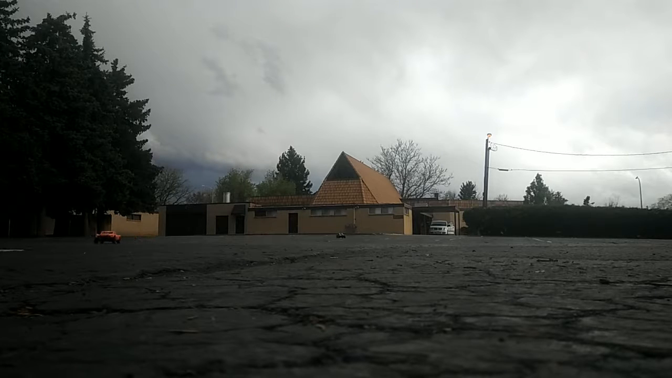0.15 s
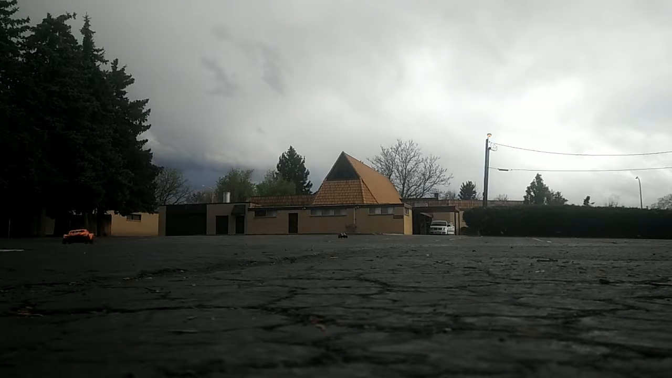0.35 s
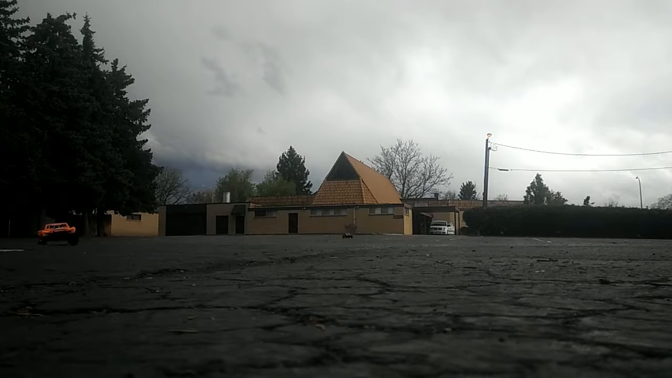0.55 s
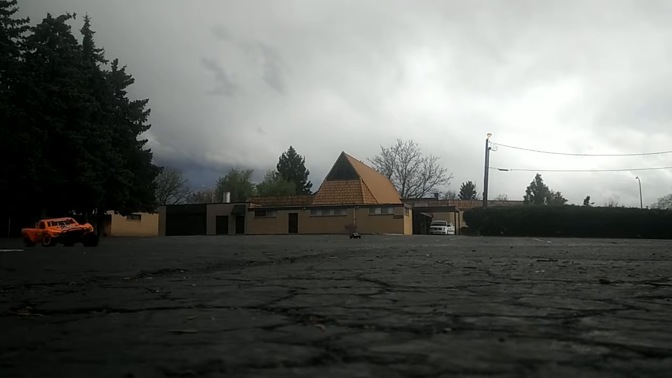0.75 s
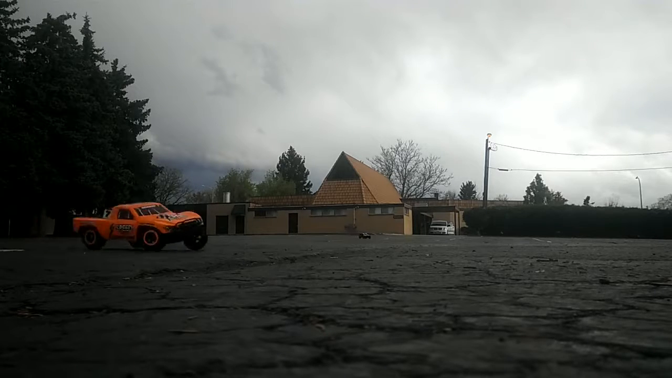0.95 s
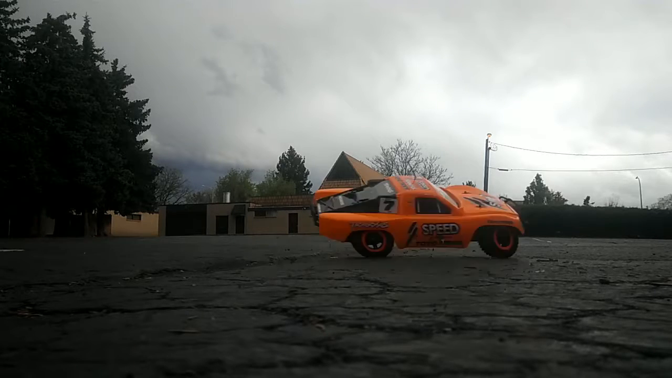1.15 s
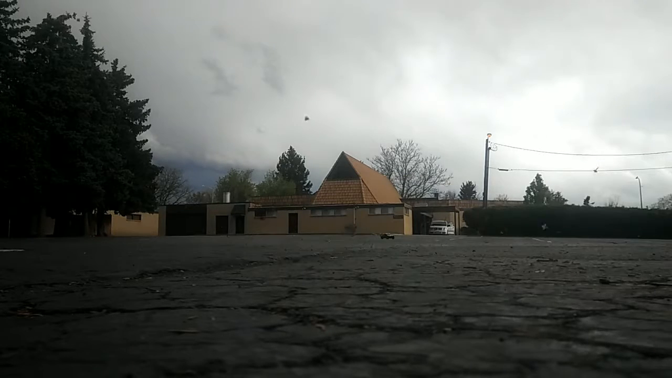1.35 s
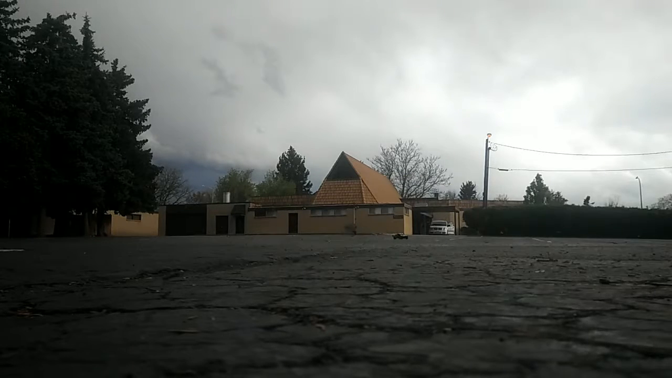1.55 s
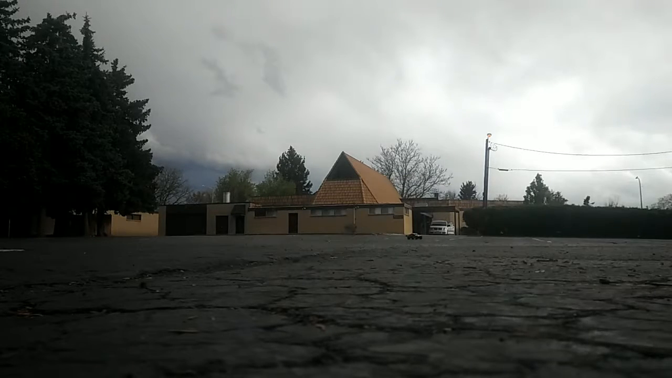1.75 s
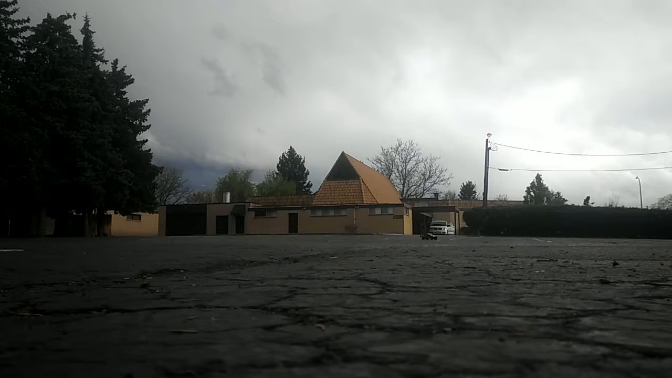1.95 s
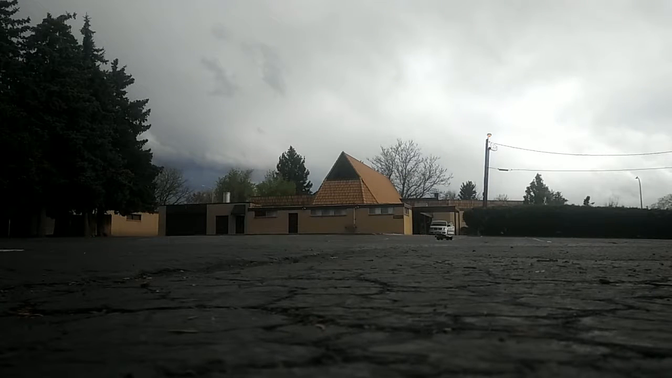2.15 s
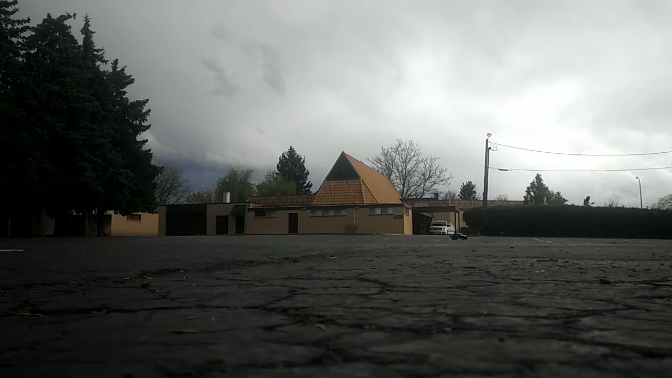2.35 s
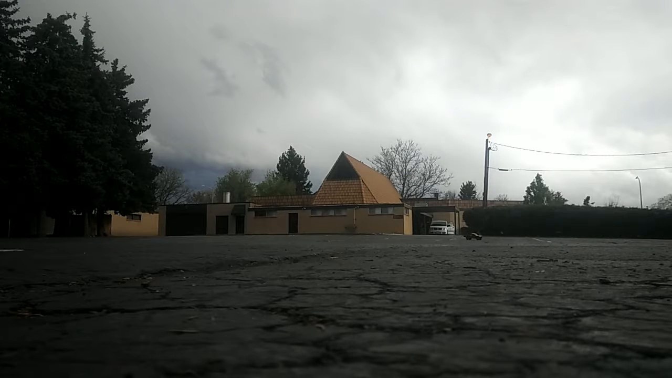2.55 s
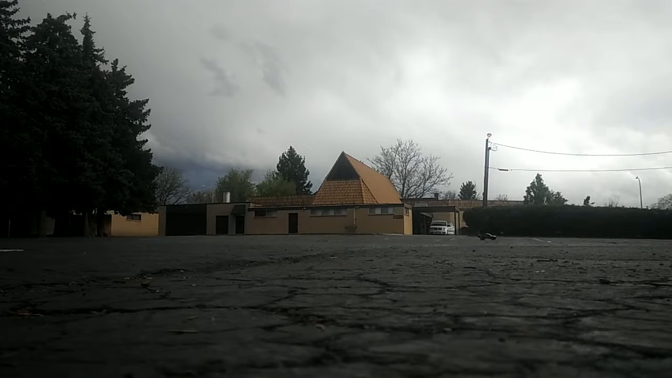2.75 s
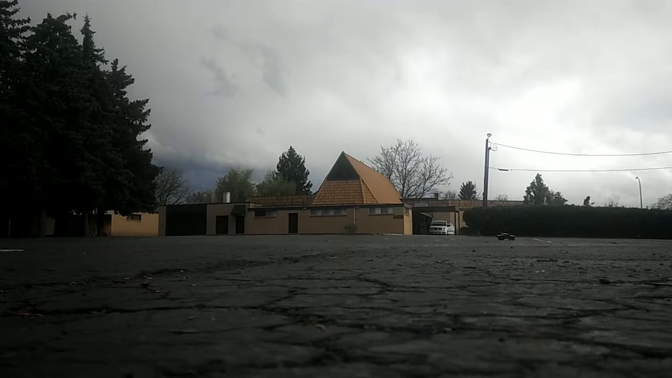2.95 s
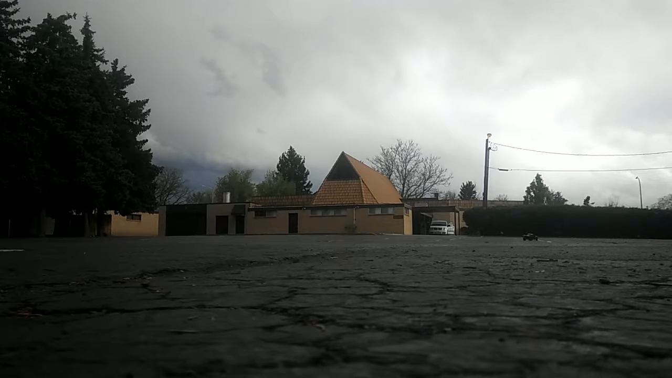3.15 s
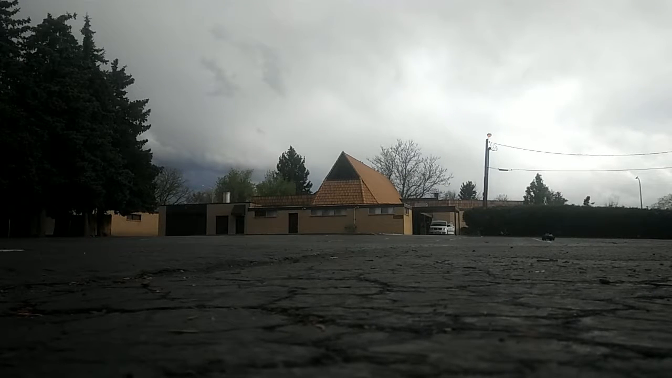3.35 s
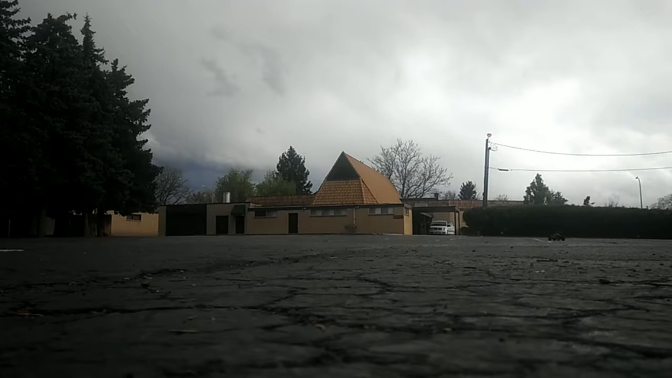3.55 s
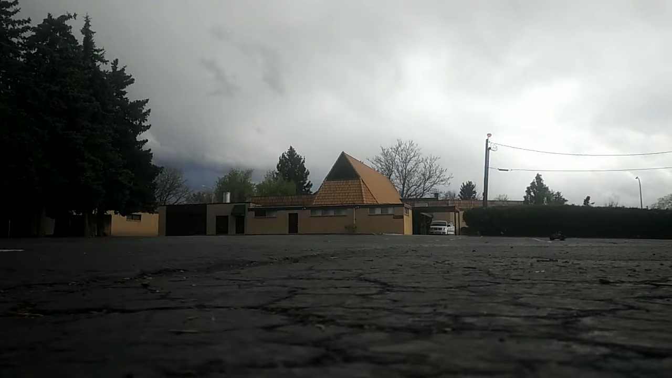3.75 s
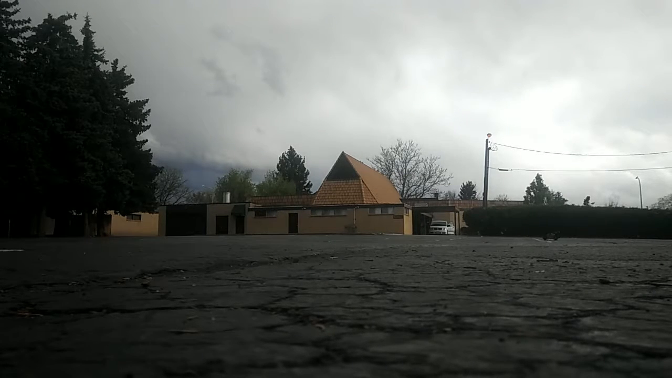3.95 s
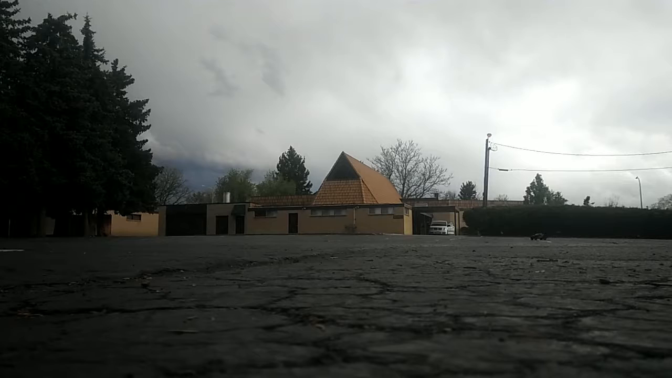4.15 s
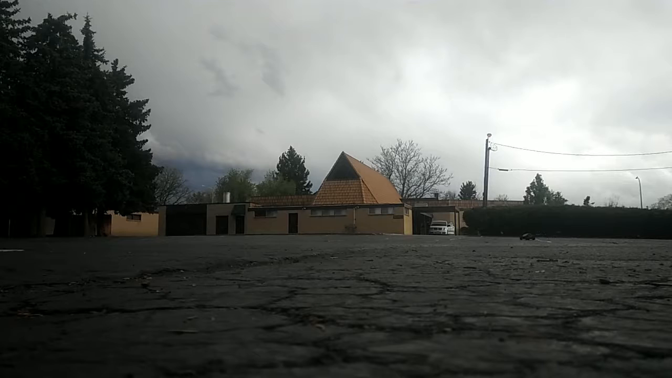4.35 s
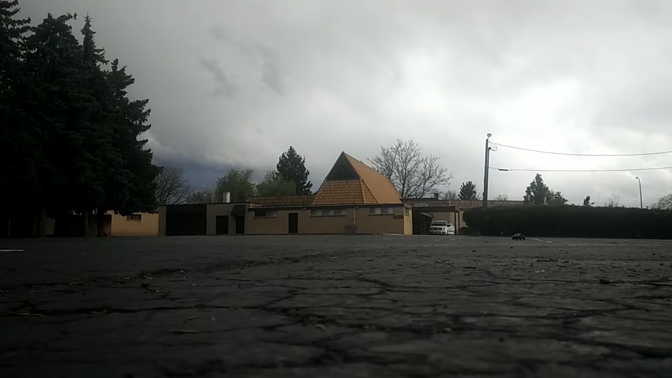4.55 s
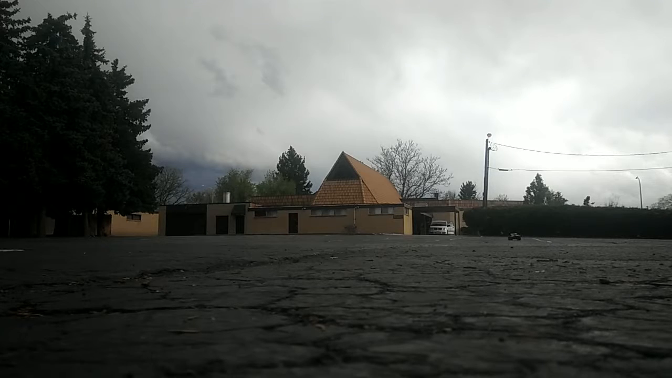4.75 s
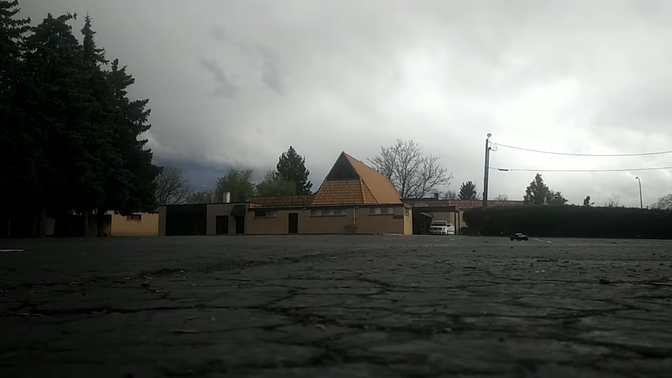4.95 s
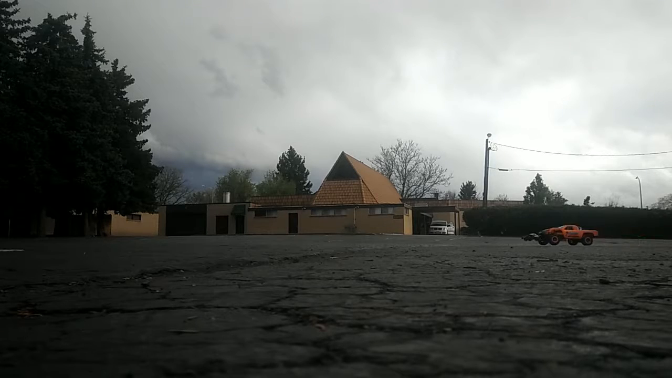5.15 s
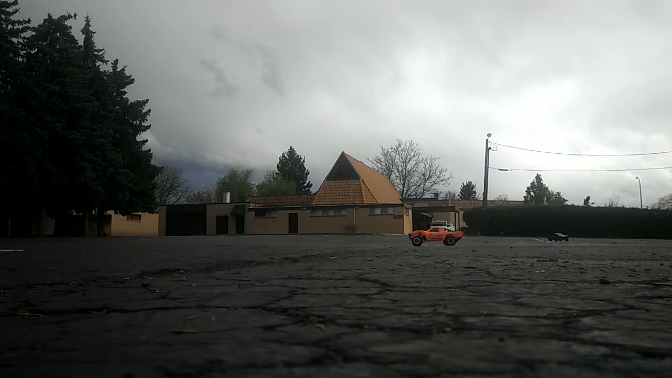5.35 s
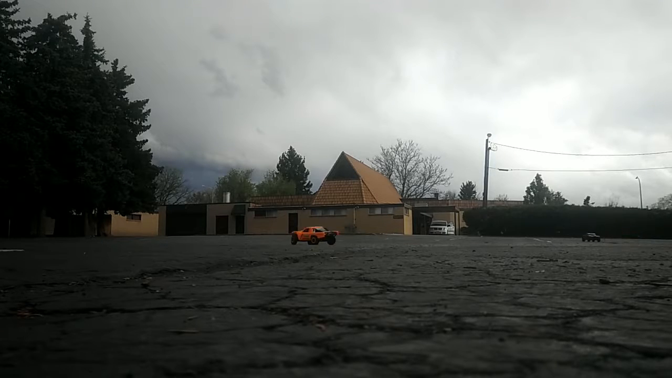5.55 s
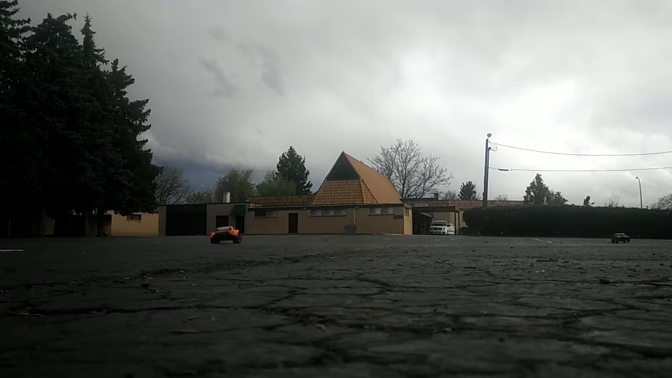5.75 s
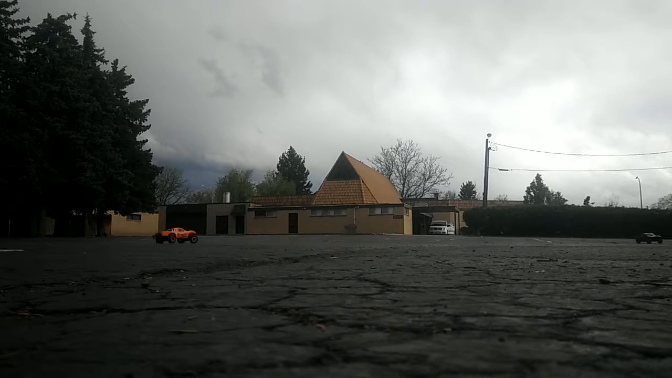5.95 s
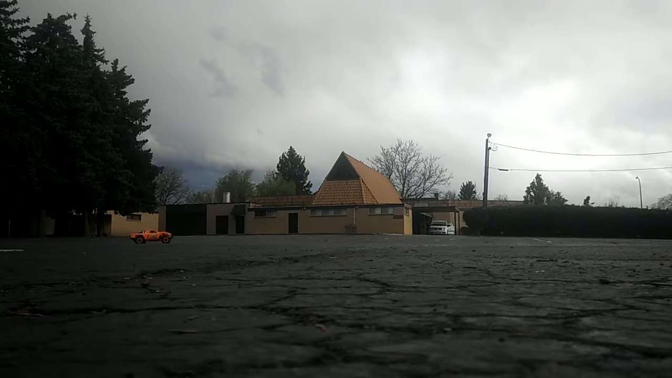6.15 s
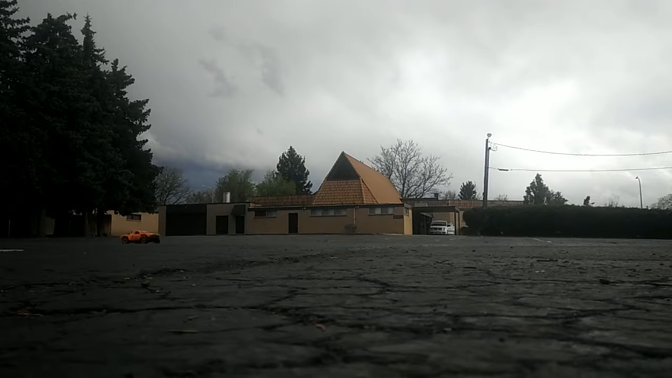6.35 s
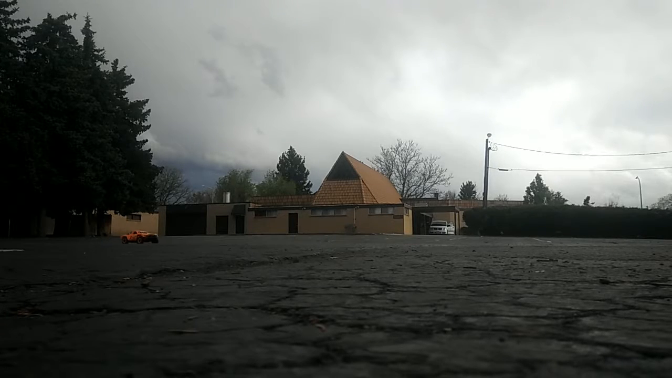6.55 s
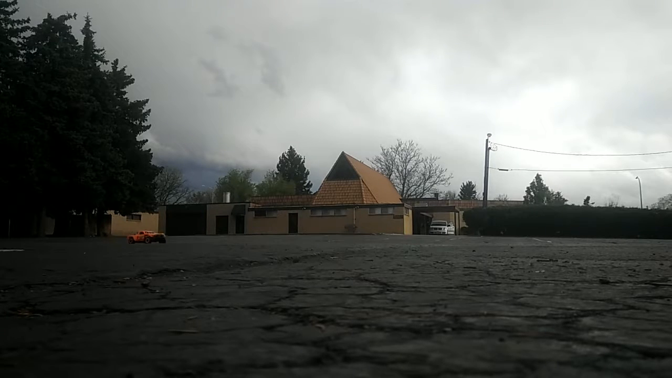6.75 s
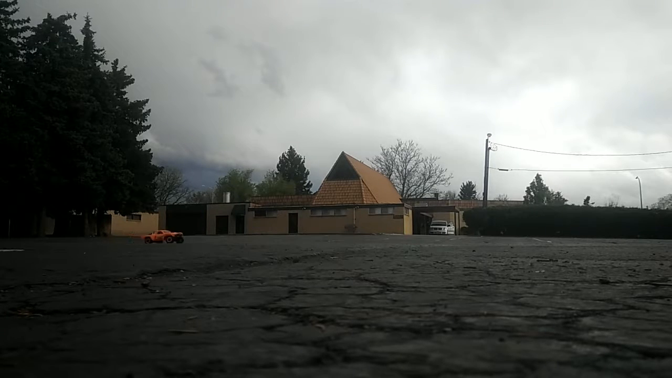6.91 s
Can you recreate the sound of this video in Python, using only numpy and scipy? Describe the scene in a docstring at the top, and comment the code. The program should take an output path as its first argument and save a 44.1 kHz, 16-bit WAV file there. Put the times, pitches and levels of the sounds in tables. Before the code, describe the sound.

Low wind buffets a microphone at ground level outdoors. A toy truck's shrill motor and tearing tyres swell quickly to a close pass, followed by loud plastic knocks, a hard crunch and broken scraping. There is a short lull with skittering stones and little tyre chirps, then the motor winds up again, whining and pulsing through a long gritty drift, dips almost to nothing and revs. Another truck buzzes weakly far away; the echo is faint.

```python
"""Toy trucks drifting on asphalt

Two small electric remote-controlled trucks, heard close to the ground. One races past, slams and scrapes
its plastic body, coasts, then whines off again with hopping wheels, brakes and pulls away. The other gives
bursts of throttle far off. Motors are sums of sine orders; tyres, scrapes and stones are filtered random
contacts; wind, thuds and ticks are filtered noise; squeaks and chirps are sines. A faint echo surrounds the trucks.
"""
import sys
import numpy as np
from scipy import signal
from scipy.fft import rfft, irfft
from scipy.io import wavfile
from scipy.ndimage import uniform_filter1d, minimum_filter1d, map_coordinates

SR = 44100
rng = np.random.default_rng(int(sys.argv[2]) if len(sys.argv) > 2 else 0)


def materialize(psi):
    """Save the field psi as 16-bit PCM at rate SR to the path in sys.argv[1].

    A 1-D psi becomes a single channel; in a 2-D psi each row is a channel.
    """
    bounded = np.clip(np.atleast_2d(psi).T, -1, 1)
    quanta = np.round(bounded * 32767).astype(np.int16)
    wavfile.write(sys.argv[1], SR, quanta)


N = 307818
TIME = np.arange(N) / SR  # seconds

# Spectra only shape a sound, which is then scaled to an rms of 1.
# A swell's length_s spans its two points at 1/e of the peak.

# Wind gusts on the microphone: middle_s, level_db, length_s
WIND_GUSTS = [(0.145, -45.5, 0.23), (0.44, -42.5, 0.18), (0.69, -36, 0.4), (1.695, -43, 1.29),
              (5.068, -48, 0.33), (6.084, -44.5, 0.13), (6.758, -38.5, 0.27)]
# Spectrum of the wind rumble: frequency_hz, level_db
WIND_SPECTRUM = [(20, -48), (50, -22.5), (90, 1.5), (140, 2.5), (210, -1.5), (320, -14.5), (3000, -95)]
BREEZE_DB = -71

# Throttle bursts of the far truck: start_s, end_s, motor_turns_hz, level_db (before the hum wavers)
FAR_BURSTS = [(2.65, 2.776, 752, -41.5), (2.818, 2.885, 750, -41.5), (2.987, 3.035, 810, -41.5),
              (3.299, 4.751, 740, -50.5), (4.801, 5.515, 804, -47.5), (5.7, 6.426, 796, -47)]
# Low motor orders that survive the distance: multiple of the motor turn, level_db
FAR_ORDERS = [(1, -5), (2, -8), (3, -9), (4, -16)]

# Loose stones skittering as the near truck coasts: start_s, level_db, length_s (before the fade)
STONE_RATTLES = [(2.326, -40, 0.014), (2.414, -35.5, 0.012), (2.474, -36.5, .006), (2.526, -38, .006),
                 (2.558, -35.5, 0.054)]
# Sideways tyre scuffs: middle_s, level_db, length_s
SCUFFS = [(2.59, -37, 0.089)]
# Rising chirps as tyres bite: middle_s, pitch_hz (at the middle), length_s, level_db
CHIRPS = [(2.745, 1420, 0.085, -39), (2.851, 1400, 0.08, -39)]
CHIRP_RISE_PER_S = 2.6  # share of the pitch gained each second
# Squeaks of tyres and suspension: middle_s, pitch_hz, length_s, level_db
SQUEAKS = [(0.895, 7260, 0.01, -27), (1.268, 7020, 0.012, -15), (2.106, 4020, 0.015, -20.5),
           (2.488, 2300, 0.0065, -26), (2.547, 9600, .035, -44), (5.589, 3000, 0.014, -31.5),
           (6.014, 4480, 0.028, -36.5), (6.082, 4570, 0.053, -38)]
# Ticks of flung grit: start_s, level_db, fade_s
GRIT_TICKS = [(1.448, -20, 0.0049), (1.629, -2.5, 0.0038), (1.635, -8, .002)]
# Spectrum of a grit tick: frequency_hz, level_db
TICK_SPECTRUM = [(2000, -36), (5000, -7), (8200, 2), (10500, -6), (13000, -4), (15500, -15)]
# Dull bumps: middle_s, level_db, length_s
BUMPS = [(0.719, -26.5, 0.029), (2.411, -31.5, 0.011), (6.034, -34, 0.016), (6.724, -24.5, 0.042)]
# Spectrum of a dull bump: frequency_hz, level_db
BUMP_SPECTRUM = [(30, -37), (190, 3.5), (255, -3), (700, -32), (3000, -98)]

# Chassis blows and scrapes: start_s, body_db, drag_s, fade_s, rasp_db (relative to the body)
SCRAPES = [(1.2, -14.5, 0.032, 0.028, -5), (1.235, -17, 0.0016, 0.0028, -15),
           (1.255, -17, 0.005, 0.035, -2.5), (1.393, -33, .02, .008, 11), (1.531, -31, 0.045, 0.039, -11),
           (1.621, -8, 0.027, 0.0099, -8), (1.653, -5.5, 0.037, 0.01, -4.5),
           (1.702, -11.5, 0.011, 0.051, -2), (1.749, -24, 0.0036, 0.012, 1),
           (1.819, -18.5, 0.059, 0.053, -5.5), (1.975, -22.5, 0.021, 0.019, -1),
           (1.996, -18, 0.027, 0.066, -5.5), (2.047, -12.5, 0.02, 0.02, -16),
           (2.083, -15.5, 0.0084, 0.023, -11), (2.15, -8, 0.0064, 0.0065, -6),
           (2.168, -16, 0.025, 0.016, -16), (2.211, -13.5, 0.0046, 0.02, -12.5),
           (2.238, -21.5, 0.04, 0.053, -7), (5.539, -33, 0.062, 0.033, -19), (5.576, -42, 0.013, 0.006, 10)]
# Resonances of the plastic body: frequency_hz, width_hz, level_db
SHELL_MODES = [(301, 31, -0.5), (478, 50, 7), (588, 60, -0.5)]
# Resonances of panels under a hard blow: frequency_hz, width_hz, level_db
PANEL_MODES = [(577, 80, 3), (744, 120, 2.5), (920, 140, -4), (1090, 88, -2.5), (1520, 100, -1),
               (2340, 130, -8.5)]
# Spectrum of the body boom: frequency_hz, level_db
BODY_SPECTRUM = [(60, -47), (120, -17), (190, -14.5), (295, -0.5), (350, -3.5), (460, 2), (720, -4.5),
                 (1070, -5.5), (1450, -14), (2200, -33), (4400, -58.5)]
# Spectrum of the low thump in the hardest blow: frequency_hz, level_db
THUMP_SPECTRUM = [(35, 2), (60, -2), (130, 3), (260, -8), (1000, -64.5)]
# Spectrum of plastic rasping on stones, also of loose stones: frequency_hz, level_db
RASP_SPECTRUM = [(150, -57), (700, -14.5), (1400, 5), (2200, 6), (3000, 1.5), (4200, 1.5), (6500, 0),
                 (8500, -7.5), (12000, -20), (15500, -30)]
SLAM_S, SLAM_LENGTH_S = 1.67, 0.077  # middle and length of the hardest blow

# Spectrum of gritty tyre scrub: frequency_hz, level_db
SCRUB_SPECTRUM = [(300, -76.5), (1000, -13.5), (1500, 2.5), (1900, 2), (2700, 1), (3450, 0.5), (4200, 0),
                  (5100, -4.5), (6300, -2.5), (7200, -6.5), (7800, -21.5), (9500, -60), (13000, -53)]
# Spectrum of the humming body: frequency_hz, level_db
HUM_SPECTRUM = [(150, -29), (310, -7), (410, 2), (470, 1), (560, -2.5), (900, -23), (2500, -73)]
# Spectrum of the low tread resonance: frequency_hz, level_db
DRONE_SPECTRUM = [(200, -47), (500, -24.5), (630, -1), (760, 3.5), (880, 0.5), (1100, -6), (5000, -88)]
# Spectrum of the high tread resonance: frequency_hz, level_db
SONG_SPECTRUM = [(350, -56.5), (800, -18.5), (1000, -4), (1350, 1.5), (1500, -1.5), (1680, -3.5),
                 (1950, -9.5), (3000, -42), (8000, -73.5)]
# Spectrum of the grit spray: frequency_hz, level_db
SPRAY_SPECTRUM = [(2000, -70), (5000, -6.5), (7500, 1.5), (8300, -2.5), (10000, -11.5), (12500, -13.5),
                  (15500, -30)]
# Spectrum of slapping tread blocks at the reference motor speed: frequency_hz, level_db
GROWL_SPECTRUM = [(400, -45), (650, -20), (760, -6), (850, 3), (950, -5), (1080, -28), (1300, -15),
                  (1520, 1.5), (1640, 5), (1800, -3), (2400, -39)]
GROWL_AT_HZ = 796  # reference motor speed

# Near motor and gear orders, before flutter and overtone loss: multiple of the motor turn, level_db
NEAR_ORDERS = [(1, -6), (2, -4), (4, 0), (6, -8), (7, -22), (8, 2.5), (9, -8.5), (12, -16.5), (16, -12.5)]
MESH, GEAR_RATIO = 8, 31  # pinion mesh order; motor turns per wheel turn
# Resonances of the gearbox housing: frequency_hz, width_hz, level_db
GEARBOX_MODES = [(1359, 92, 3.5), (3430, 64, -1.5), (6050, 110, -3.5), (6940, 99, -2)]

# Run-up motor speed, dropping in pitch on passing: time_s, motor_turns_hz
RUN_UP_SPEED = [(0, 885), (1.27, 886), (1.43, 845), (1.475, 682), (1.58, 683), (2.1, 510), (2.4, 403)]
# Run-up distance from the listener: time_s, distance_m
RUN_UP_DISTANCE = [(0, 5.94), (.35, 5.8), (.6, 3.93), (.85, 2.9), (1.17, 1.2), (1.31, 1.17), (1.41, 0.68),
                   (1.55, 1.01), (2.15, 1.98), (2.4, 5.5), (2.65, 5.5), (2.82, 9.2)]
# Run-up tyre sounds by name: level_db (at 1 m, before ground loss), ground_loss_db_per_m
RUN_UP_TYRES = dict(scrub=(-23.5, 1), hum=(-28.5, 3.65), drone=(-30, 1.7), song=(-25, .02),
                spray=(-21, 6.5))

# Second-run motor speed, before wheel hop sways it: time_s, motor_turns_hz
SECOND_RUN_SPEED = [(2.943, 389.6), (2.946, 499), (2.975, 501), (2.99, 544), (3.015, 556), (3.03, 588),
                    (3.078, 619.6), (3.1, 599.3), (3.14, 655), (3.2, 695.5), (3.4, 793), (3.75, 778.6),
                    (4.2, 671), (4.65, 676.3), (5.0, 785), (5.4, 771.7), (5.8, 812), (6.2, 774),
                    (6.44, 756), (6.5, 691), (6.6, 415), (6.64, 276), (6.71, 100), (6.77, 155), (6.83, 410),
                    (6.89, 522), (6.98, 580)]
# Second-run path: time_s, distance_m, and added drone_db (low tread), song_db (high tread), whine_db
SECOND_RUN_PATH = [(2.9, 3.4, -21, -6, 2.5), (3.03, 3.9, -11, 2, -1.5), (3.09, 3.42, -1, 4, -4),
                   (3.4, 3.06, 0, 0.5, -2.5), (3.9, 3.43, 1.5, 3.5, 2), (4.3, 3.7, 2.5, -0.5, 0),
                   (4.68, 3.77, -7.5, -18, -1.5), (4.95, 3.24, -2.5, -11, -3), (5.4, 3.28, 0.5, -3.5, -3),
                   (6.0, 3.18, 4.5, 5.5, -5), (6.38, 3.86, 3.5, 3.5, -3), (6.65, 6.2, 4.5, 3.5, 1.5),
                   (6.98, 5.7, 8, 6, 4.5)]
# Second-run tyre sounds by name: level_db (at 1 m, before ground loss), ground_loss_db_per_m
SECOND_RUN_TYRES = dict(scrub=(-24.5, 0.43), hum=(-56, 0.73), drone=(-32, 0.33), song=(-29.5, 0.051),
                    spray=(-14, 6.24))
# Wheels spinning as the truck pulls away: middle_s, added scrub_and_spray_db, added motor_db, length_s
WHEELSPINS = [(2.998, 1.0, 9, 0.27), (6.972, 6.5, -4, 0.12)]
# Rough patches that make the body hum: middle_s, added level_db, length_s
ROUGH_PATCHES = [(3.549, 15.5, 0.064), (4.65, 16.5, 0.15), (5.3, 12, 0.58), (5.687, 25, 0.12),
                 (6.26, 22.5, 0.19)]
LAUNCH_S = 2.897  # the throttle opens for the second run


def undb(db):
    """Decibels to gain."""
    return 10 ** (np.asarray(db) / 20)


def unit(x):
    """Scale to an rms of 1."""
    return x / np.sqrt(np.mean(x ** 2))


def curves(rows):
    """Draw each column of a table as a line through time."""
    s, *columns = np.transpose(rows)
    return [np.interp(TIME, s, column) for column in columns]


def swell(s, length):
    """A smooth bump centred on a moment."""
    return np.exp(-(2 * (TIME - s) / length) ** 2)


def gate(start, end, edge):
    """On between two moments, with straight edges of the given length."""
    return np.clip(np.minimum(TIME - start, end - TIME) / edge + .5, 0, 1)


def walk(rate):
    """Smooth random drift with an rms of 1, from the given number of random steps per second."""
    k = max(int(SR / rate), 1)
    steps = np.repeat(rng.standard_normal(N // k + 1), k)
    return unit(uniform_filter1d(uniform_filter1d(steps, k), k)[:N])


def grit(rate, spread_db):
    """Tiny contacts at random, rate per second; a positive spread makes a few harder, a negative one weaker."""
    size = undb(spread_db * np.minimum(rng.exponential(size=N), 5))
    return unit((rng.random(N) < rate / SR) * size * rng.standard_normal(N))


def colour(x, points):
    """Causal filter through (Hz, dB) points; the result has an rms of 1."""
    hz, db = np.transpose(points)
    size = 4096
    grid = np.maximum(np.fft.rfftfreq(size, 1 / SR), 1)
    cepstrum = irfft(np.log(undb(np.interp(np.log(grid), np.log(hz), db))))
    # Folding the cepstrum forward gives the filter minimum phase
    cepstrum[1:size // 2] *= 2
    cepstrum[size // 2 + 1:] = 0
    impulse = irfft(np.exp(rfft(cepstrum)))
    return unit(signal.fftconvolve(x, impulse)[:N])


def resonate(x, modes):
    """Ring a set of (Hz, width Hz, dB) resonances; the result has an rms of 1."""
    rings = (undb(db) * signal.lfilter(*signal.iirpeak(hz, hz / width, fs=SR), x) for hz, width, db in modes)
    return unit(sum(rings))


def bend(x, ratio):
    """Shift all the pitches of a sound by a ratio that changes with time, by varying its playback speed."""
    return map_coordinates(x, [np.cumsum(ratio)], order=3, mode="mirror")


def carry(metres, db, loss_db):
    """Gain at a distance: spreading, and a further loss for each metre of asphalt."""
    return undb(db - loss_db * metres) / np.maximum(metres, .1)


def wind():
    """Eddies rumble on the microphone: gusts swell and die over a faint breeze."""
    strength = undb(BREEZE_DB) + sum(undb(db) * swell(s, length) for s, db, length in WIND_GUSTS)
    return strength * undb(3.24 * walk(30)) * colour(rng.standard_normal(N), WIND_SPECTRUM)


def car_park(x, t60_s=0.61, echo_db=-27):
    """Distant walls and trees return a faint, dull tail."""
    tail_spectrum = [(150, -20.0), (800, -8.5), (2500, -7.0), (7000, -6.5), (12000, -37)]
    tail = colour(rng.standard_normal(N), tail_spectrum)
    tail = (tail * undb(-60 * TIME / t60_s) * (TIME > .04))[:SR]
    return x + undb(echo_db) * signal.fftconvolve(x, tail / np.linalg.norm(tail))[:N]


def whine(hz, orders, wobble, rough, flutter_db, overtone_db=0, full_hz=680):
    """Motor and gear orders; load sways the speed, and play between the teeth smears each line."""
    turns = np.cumsum(hz * (1 + wobble * walk(45) + rough * walk(700))) / SR
    # The rotor only shakes at speed; the teeth sing at any speed
    shake = np.minimum(hz / full_hz, 1) ** 6
    total = np.zeros(N)
    for order, db in orders:
        weight = 1 if order >= MESH - 1 else shake
        above_mesh_db = overtone_db * (order > MESH + 1)
        level = undb(db + flutter_db * walk(70)) * weight * undb(above_mesh_db)
        total += level * np.sin(2 * np.pi * order * turns)
    return unit(total)


def no_bass(x):
    """A gearbox this small radiates no bass."""
    return signal.sosfilt(signal.butter(6, 640, "high", fs=SR, output="sos"), x)


def far_truck(edge_s=0.029, gearbox_db=-7, scrub_db=-4, waver_db=2.0):
    """Bursts of throttle far off, each at its own speed: a wavering hum under hoarse gears and tyre scrub."""
    (hz,) = curves([(s, hz) for start, end, hz, db in FAR_BURSTS for s in (start, end)])
    throttle = sum(undb(db) * gate(start, end, edge_s) for start, end, _, db in FAR_BURSTS)
    hoarse = undb(gearbox_db) * resonate(grit(rate=3600, spread_db=2.0), GEARBOX_MODES[:1])
    scrub = undb(scrub_db) * colour(grit(rate=5400, spread_db=0.5), SCRUB_SPECTRUM)
    hum = whine(hz, FAR_ORDERS, wobble=.014, rough=.03, flutter_db=3.5)
    hum = hum * undb(waver_db * (walk(25) + 1))
    return no_bass(throttle * (hum + hoarse + scrub))


def thuds():
    """Short, dull bumps of low noise close to the microphone."""
    force = sum(undb(db) * swell(s, length) for s, db, length in BUMPS)
    return force * colour(rng.standard_normal(N), BUMP_SPECTRUM)


def stones(fade_s=0.021):
    """Short rattles of loose grit: random contacts that start at once and fade."""
    force = np.zeros(N)
    for s, db, length in STONE_RATTLES:
        force += undb(db) * (TIME > s) * np.exp(-np.maximum(TIME - s - length, 0) / fade_s)
    return force * colour(grit(rate=9000, spread_db=3.0), RASP_SPECTRUM) * undb(3.1 * walk(220))


def ticks():
    """Sharp, bright ticks of flung grit: noise that starts at once and dies away."""
    force = sum(undb(db) * (TIME > s) * np.exp(-np.maximum(TIME - s, 0) / fade) for s, db, fade in GRIT_TICKS)
    return force * colour(rng.standard_normal(N), TICK_SPECTRUM)


def slips(rough=.02, octave_db=-9):
    """Tyres lose and regain their grip: gritty scuffs and short rising chirps."""
    scuff_force = sum(undb(db) * swell(s, length) for s, db, length in SCUFFS)
    out = scuff_force * colour(grit(rate=3000, spread_db=6.0), SONG_SPECTRUM)
    sway = 1 + rough * walk(360)
    for s, hz, length, db in CHIRPS:
        pitch_hz = hz * sway * (1 + CHIRP_RISE_PER_S * (TIME - s))
        phase = 2 * np.pi * np.cumsum(pitch_hz) / SR
        chirp = unit(np.sin(phase) + undb(octave_db) * np.sin(2 * phase))
        out = out + undb(db) * swell(s, length) * chirp
    return out


def squeaks(rough=0.025):
    """Brief stick-slip tones of unsteady pitch."""
    clock = np.cumsum(1 + rough * walk(600)) / SR
    out = np.zeros(N)
    for s, hz, length, db in SQUEAKS:
        out += undb(db) * swell(s, length) * np.sqrt(2) * np.sin(2 * np.pi * hz * clock)
    return out


def chassis(hard_db=-6, flex=.035, sag=.2, screech_db=1, screech_s=0.021):
    """Dense slips boom in the plastic shell and rasp on stones; panels flex, and screech in the hardest blow."""
    push, drag = np.zeros(N), np.zeros(N)
    for s, db, hold, fade, rasp_db in SCRAPES:
        age = np.maximum(TIME - s, 0)
        rise = min(0.00069 * undb(2 * (hard_db - db)), hold / 2)  # gentle contacts ease in
        contact = np.minimum(age / rise, 1) * np.exp(-np.maximum(age - hold, 0) / fade)
        push += undb(db) * contact
        drag += undb(db + rasp_db) * contact
    force = np.minimum(push / undb(hard_db), 1)
    slam = swell(SLAM_S, SLAM_LENGTH_S)
    # The panel pitch falls through the hardest blow
    buckle = 1 - sag * slam * (TIME - SLAM_S) / (SLAM_LENGTH_S / 4)
    shell = bend(resonate(grit(rate=4000, spread_db=0.5), SHELL_MODES), 1 + flex * walk(25))
    boom = colour(grit(rate=3700, spread_db=1.5), BODY_SPECTRUM) * undb(-2.5) + shell * undb(-6.0)
    crunch = bend(resonate(grit(rate=3700, spread_db=-3.5), PANEL_MODES), buckle)
    crunch = crunch * undb(-0.5) * force ** 0.82
    thump = colour(rng.standard_normal(N), THUMP_SPECTRUM) * undb(-34.0) * slam
    rasp_flutter_db = 6.3 * np.tanh(walk(260)) + 3.2 * np.tanh(walk(90))
    rasp = colour(grit(rate=7000, spread_db=2.5), RASP_SPECTRUM) * undb(rasp_flutter_db)
    screech = bend(resonate(grit(rate=2500, spread_db=5.0), PANEL_MODES[-3:]), buckle)
    screech = screech * undb(screech_db) * swell(SLAM_S, screech_s)
    return push * (boom + crunch) + thump + screech + drag * rasp


def tyres(metres, parts, hop=0, spin_db=0, drone_db=0, song_db=0, shake_db=0):
    """Rubber tears over stones: gritty scrub, body hum, two tread resonances and a spray that dies with distance."""
    cracks = walk(110)  # cracks in the asphalt jolt everything but the hum together
    scrub = colour(grit(rate=12000, spread_db=1.5), SCRUB_SPECTRUM)
    hum = colour(grit(rate=2800, spread_db=-0.5), HUM_SPECTRUM)
    drone = colour(grit(rate=3000, spread_db=-1.0), DRONE_SPECTRUM)
    song = colour(grit(rate=3000, spread_db=1.0), SONG_SPECTRUM)
    spray = colour(grit(rate=5700, spread_db=0.5), SPRAY_SPECTRUM)
    sounds = dict(
        scrub=scrub * undb(spin_db + 1.3 * cracks + 0.52 * hop),
        hum=hum * undb(shake_db + 5.6 * walk(25)),
        drone=drone * undb(drone_db + 2.45 * cracks),
        song=song * undb(song_db + 0.95 * cracks + 1.1 * hop),
        spray=spray * undb(spin_db + 2.34 * cracks))
    return sum(sounds[name] * carry(metres, db, loss_db) for name, (db, loss_db) in parts.items())


def growl(hz, metres, db=-27, start=4.44, end=5.64):
    """In the long slide the tread blocks slap the asphalt: two broad bands that follow the wheel speed."""
    slap = colour(grit(rate=3000, spread_db=2.5), GROWL_SPECTRUM)
    return bend(slap, hz / GROWL_AT_HZ) * carry(metres, db, 0) * gate(start, end, 0.33)


def wheel_hop(hz, uneven=0.0607, start=4.18, end=6.1, elsewhere=0.2):
    """The wheels bounce once a slightly uneven turn, hardest while the truck slides."""
    turns = np.cumsum(hz / GEAR_RATIO * (1 + uneven * walk(10))) / SR
    depth = elsewhere + (1 - elsewhere) * gate(start, end, 0.089)
    return np.cos(2 * np.pi * turns) * depth


def gearbox_ring(low_hz=950, top_hz=7500):
    """Hoarse gears ring their housing, which lets neither bass nor high treble out."""
    ring = resonate(grit(rate=5000, spread_db=3.0), GEARBOX_MODES)
    return signal.sosfilt(signal.butter(10, [low_hz, top_hz], "band", fs=SR, output="sos"), ring)


def run_up(motor_db=-24.0, motor_loss_db=5.0, gearbox_db=-24.5, gearbox_loss_db=1.3, coast_s=3.1,
           tread_db_per_hz=0.04):
    """Races close past and coasts: loaded gears turn hoarse and ring; the tread quietens as it slows."""
    (hz,), (metres,) = curves(RUN_UP_SPEED), curves(RUN_UP_DISTANCE)
    load = np.clip((hz - 660) / 40, 0, 1)
    motor = whine(hz, NEAR_ORDERS, wobble=0.00792, rough=0.00656 + 0.0253 * load,
                  flutter_db=9.0, overtone_db=-5.5)
    motor = motor * carry(metres, motor_db, motor_loss_db)
    motor += load * gearbox_ring() * carry(metres, gearbox_db, gearbox_loss_db)
    tread_db = tread_db_per_hz * (hz - hz.max())
    rolling = tyres(metres, RUN_UP_TYRES, drone_db=tread_db, song_db=tread_db)
    # Both fade out around coast_s, the motor more slowly
    return no_bass(motor) * gate(-1, coast_s, 0.23) + rolling * gate(-1, coast_s, 0.06)


def second_run(motor_db=-25.0, motor_loss_db=0.43, race=.021, hop_db=3.5, patchy_db=1.15, stutter_db=3,
               settled_hz=660, overtone_db_per_m=4, grip_s=0.023, full_whine_hz=260):
    """Launches, drifts, brakes, pulls away: lifting wheels let the motor race; it stutters low, turns hoarse high."""
    (hz,) = curves(SECOND_RUN_SPEED)
    metres, drone_db, song_db, whine_db = curves(SECOND_RUN_PATH)
    hop = wheel_hop(hz)
    spin_db = sum(db * swell(s, length) for s, db, _, length in WHEELSPINS)
    strain_db = sum(db * swell(s, length) for s, _, db, length in WHEELSPINS)
    shake_db = sum(db * swell(s, length) for s, db, length in ROUGH_PATCHES)
    load = np.clip((hz - 730) / 70, 0, 1)  # towards top speed
    labour = np.clip((settled_hz - hz) / 100, 0, 1)  # towards low speed
    broken_db = patchy_db * (1 - labour) * walk(40) + stutter_db * labour * np.tanh(2 * walk(130))
    racing_hz = hz * (1 + race * hop * (1 - labour))
    motor = whine(racing_hz, NEAR_ORDERS, wobble=.007, rough=0.01795 + 0.0198 * load + 0.0063 * labour,
                  flutter_db=3, overtone_db=-overtone_db_per_m * (metres - metres.min()))
    level_db = motor_db + whine_db + strain_db + hop_db * hop + broken_db
    motor_gain = carry(metres, level_db, motor_loss_db) * np.minimum(hz / full_whine_hz, 1)
    rolling = tyres(metres, SECOND_RUN_TYRES, hop, spin_db, drone_db, song_db, shake_db)
    launch = np.clip((TIME - LAUNCH_S) / grip_s, 0, 1)
    return (no_bass(motor) * motor_gain + growl(hz, metres) + rolling) * launch


def scene():
    """Both trucks with the echo of the open space, then bumps and wind without it."""
    near_truck = run_up() + second_run() + chassis()
    details = stones() + slips() + ticks() + squeaks()
    return (car_park(far_truck() + details + near_truck) + thuds() + wind())[None]


def record(dry, ceiling=1.62, knee=5, top_hz=15700):
    """A fast limiter holds the hardest blows and overload rounds their peaks; the top is cut."""
    size = 220  # limiter window, samples
    gain = ceiling / np.maximum(np.abs(dry), ceiling)
    held = dry * uniform_filter1d(minimum_filter1d(gain, size), size)
    rounded = 0.86 * held / (0.89 ** knee + np.abs(held) ** knee) ** (1 / knee)
    return signal.sosfilt(signal.ellip(10, .2, 80, top_hz, fs=SR, output="sos"), rounded)


dry = scene()
out = record(dry)
materialize(out)
```